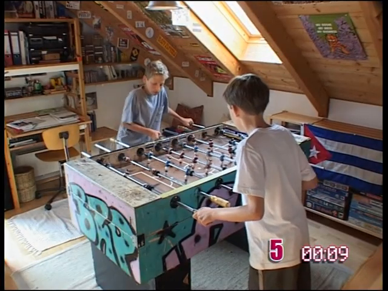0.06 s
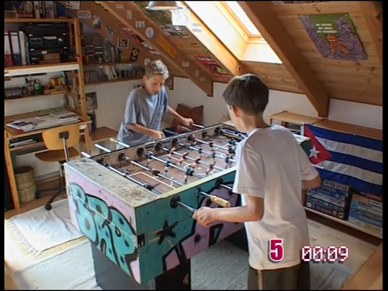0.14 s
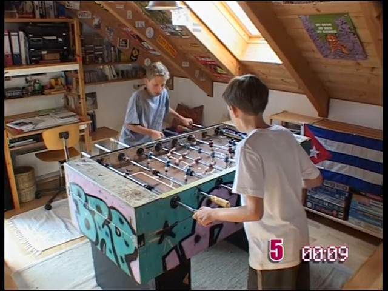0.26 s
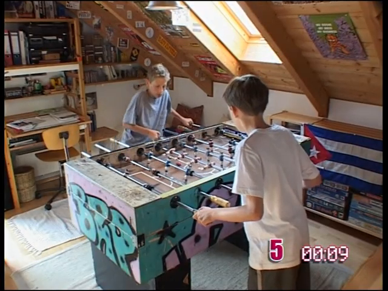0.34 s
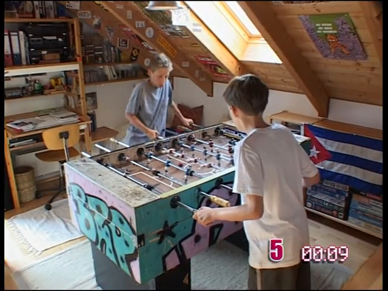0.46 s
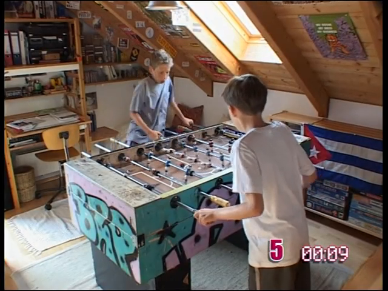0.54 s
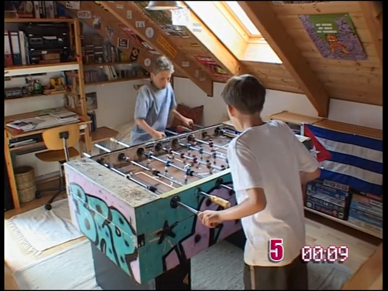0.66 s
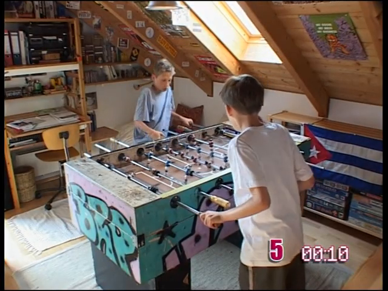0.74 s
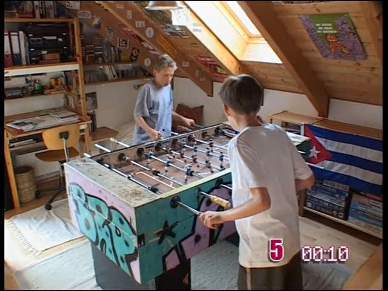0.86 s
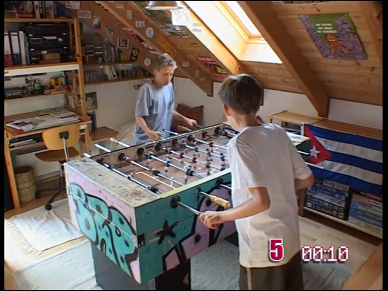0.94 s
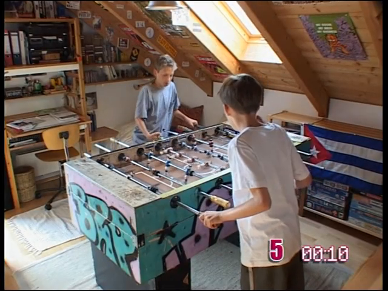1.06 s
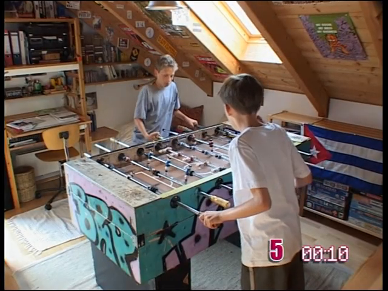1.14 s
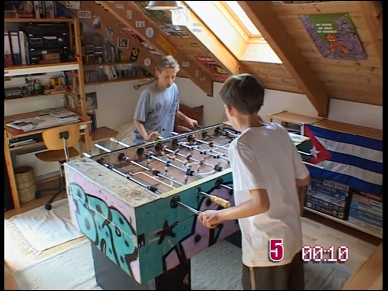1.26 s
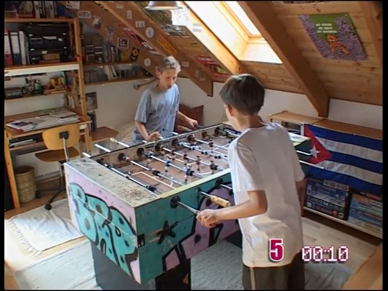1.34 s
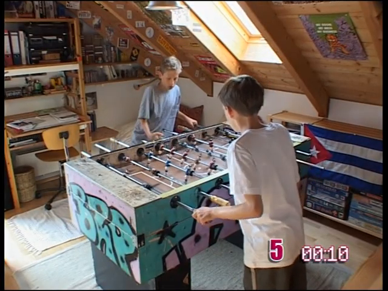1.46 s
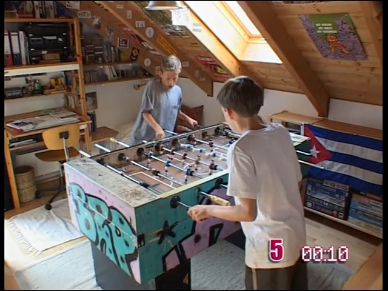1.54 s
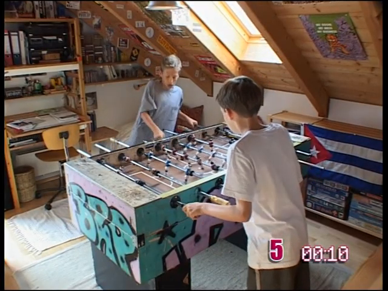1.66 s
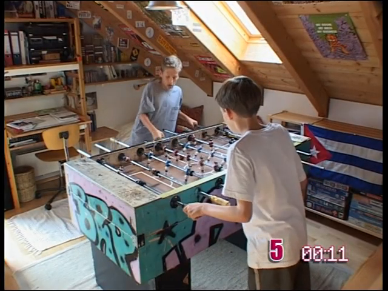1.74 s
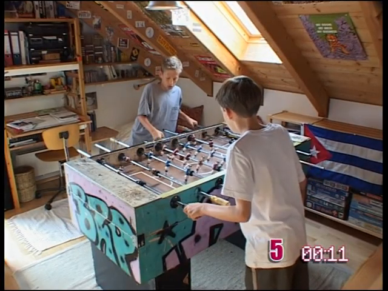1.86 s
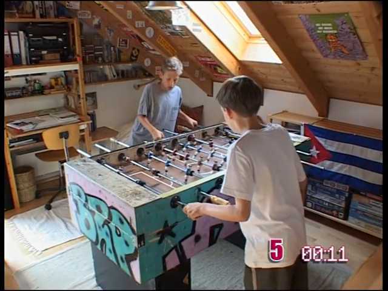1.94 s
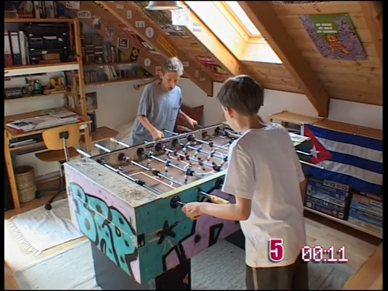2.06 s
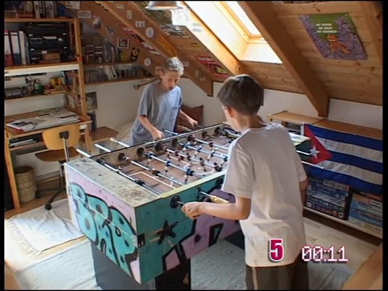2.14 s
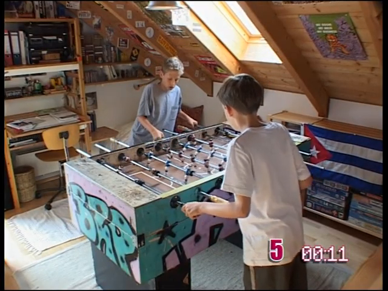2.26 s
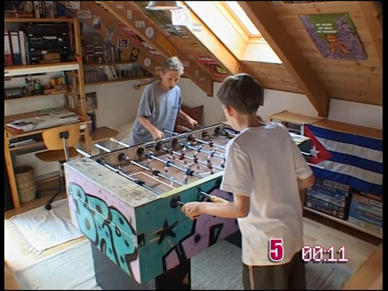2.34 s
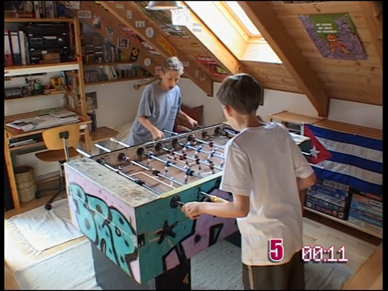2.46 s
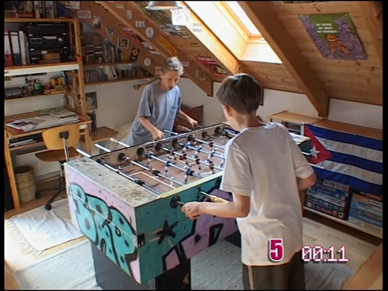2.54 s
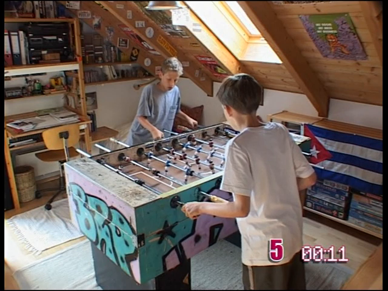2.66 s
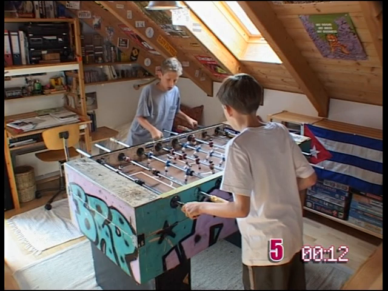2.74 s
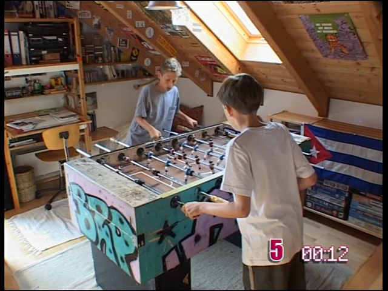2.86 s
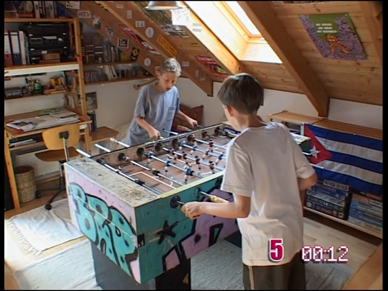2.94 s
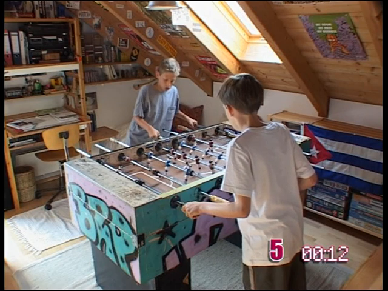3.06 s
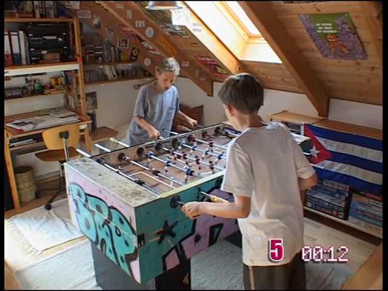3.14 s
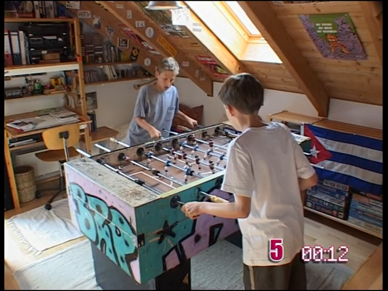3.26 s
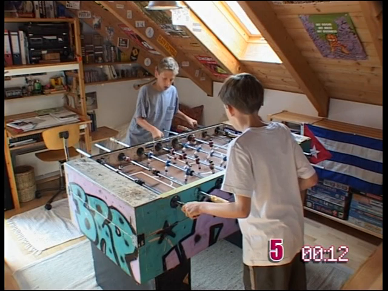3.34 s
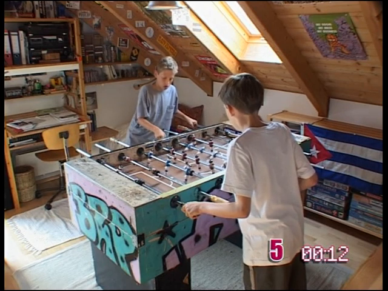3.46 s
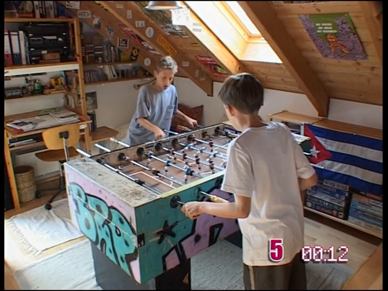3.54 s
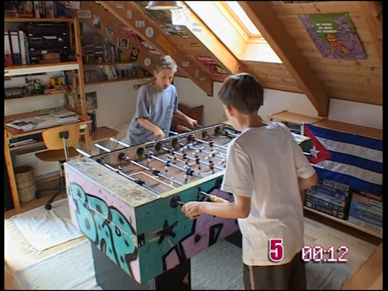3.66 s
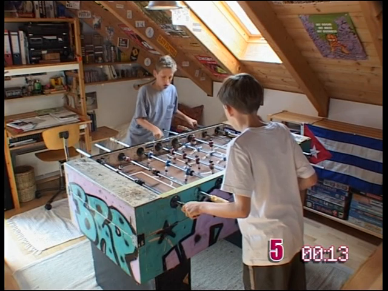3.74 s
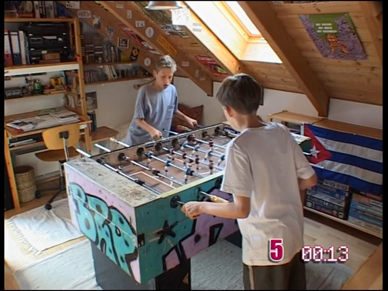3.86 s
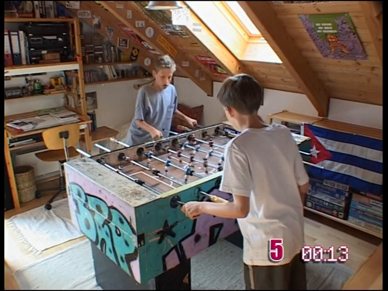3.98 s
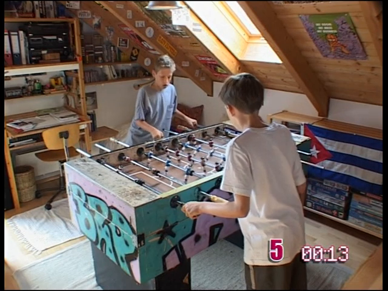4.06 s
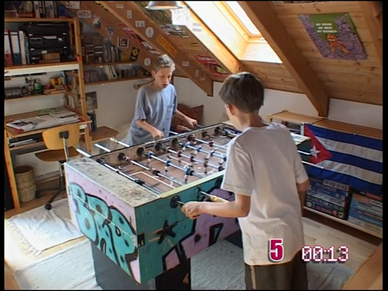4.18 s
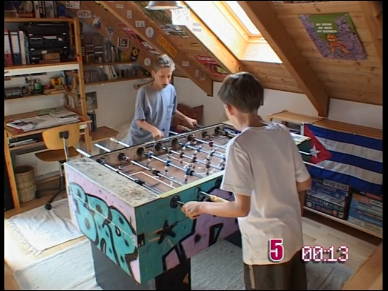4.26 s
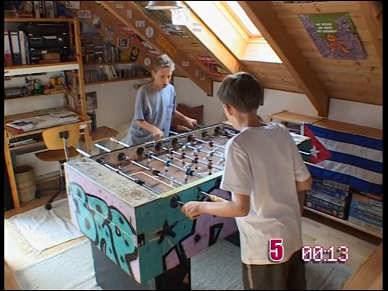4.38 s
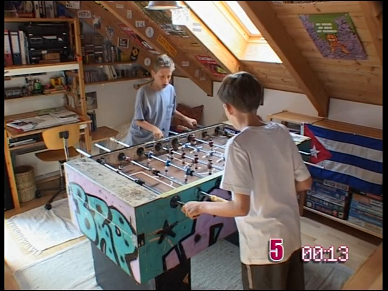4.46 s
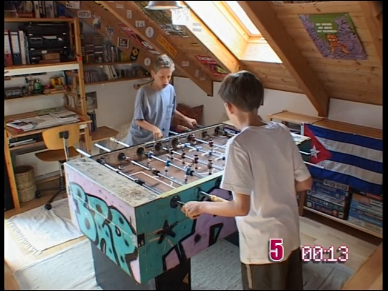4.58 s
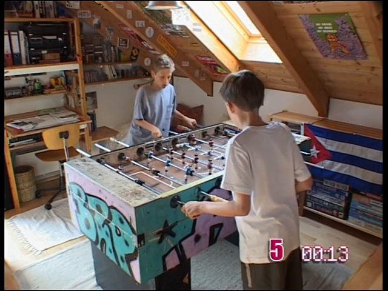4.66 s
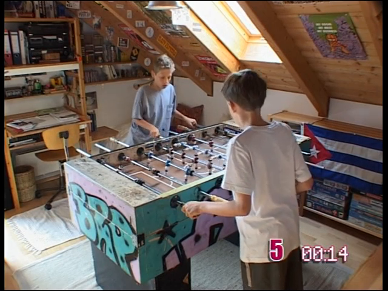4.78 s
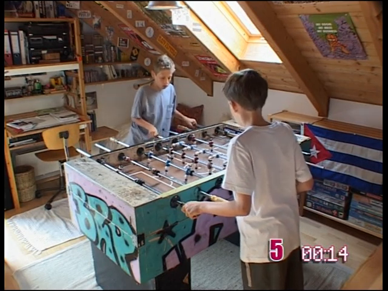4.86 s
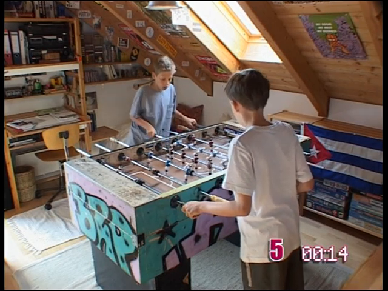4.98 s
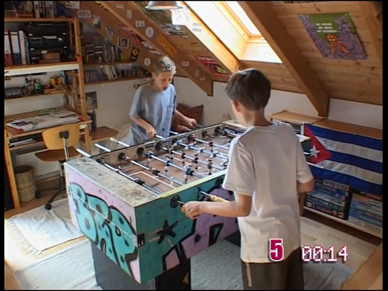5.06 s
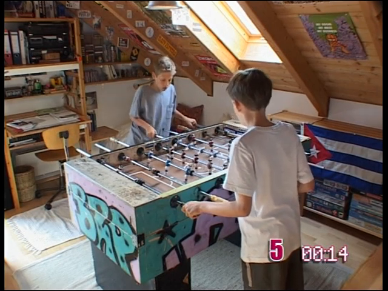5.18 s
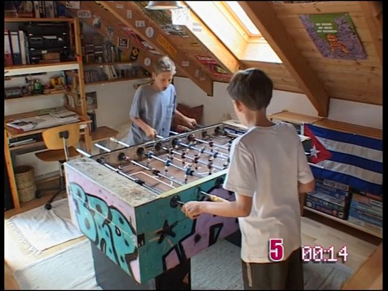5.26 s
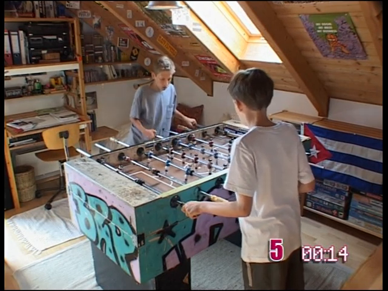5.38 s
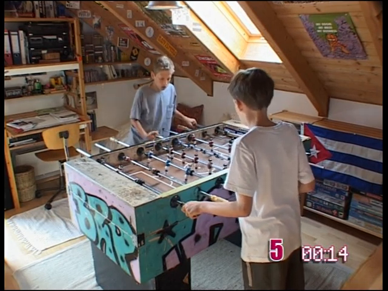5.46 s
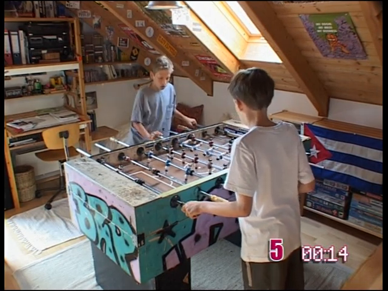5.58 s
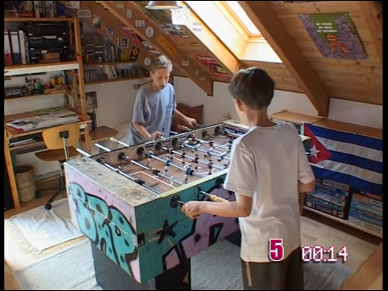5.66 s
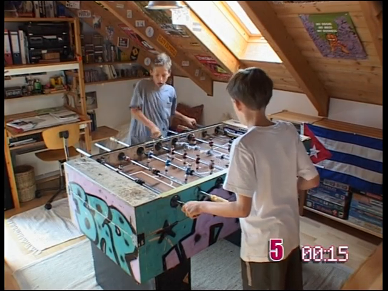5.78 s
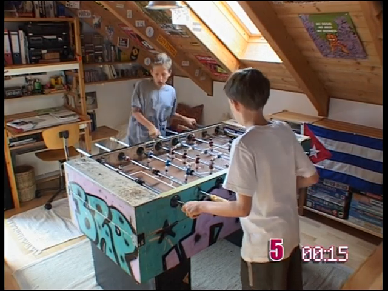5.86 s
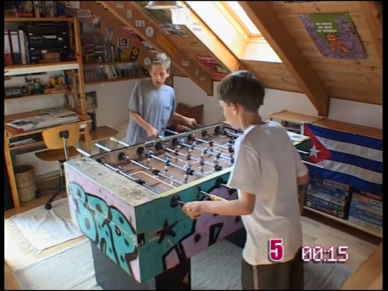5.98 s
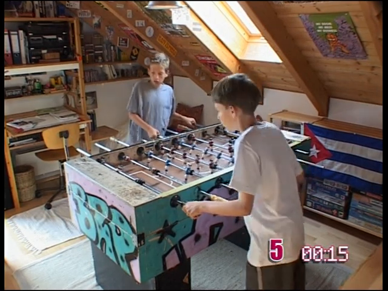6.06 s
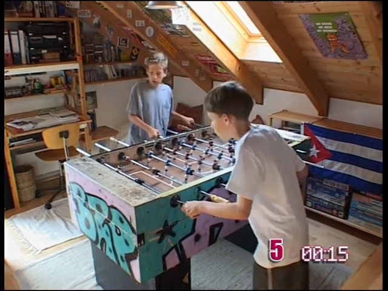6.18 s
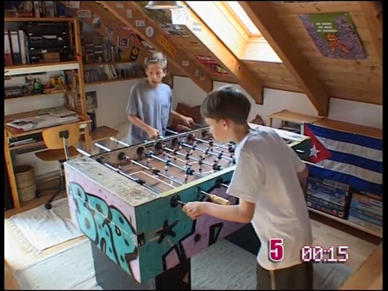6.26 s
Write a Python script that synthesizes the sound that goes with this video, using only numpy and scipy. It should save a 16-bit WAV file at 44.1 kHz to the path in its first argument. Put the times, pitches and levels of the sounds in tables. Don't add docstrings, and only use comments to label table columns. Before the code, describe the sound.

Table football in a small wood-lined room, heard from a few metres by a small camera microphone. A pair of hard clacks comes early, then a few woody knocks with the ball rumbling softly between them. Play goes quiet with faint taps and rod slides, one moderate knock, then a hard stroke and a cluster of loud cracks near the end. Faint hiss, hum and a brief lens whine lie beneath.

```python
import sys
import numpy as np
from scipy import signal
from scipy.fft import rfft, irfft, next_fast_len
from scipy.io import wavfile
from scipy.ndimage import uniform_filter1d

SR = 44100
rng = np.random.default_rng(int(sys.argv[2]) if len(sys.argv) > 2 else 0)


def field_ratio(decibels):
    return 10 ** (np.asarray(decibels, dtype=float) / 20)


def output_pcm(signal):
    pcm = np.clip(np.atleast_2d(signal).T, -1, 1) * 32767
    wavfile.write(sys.argv[1], SR, np.round(pcm).astype(np.int16))


N = 278271

# frequency in Hz, level in dB per Hz.
HISS_COLOUR = [(12, -32.5), (20, 2), (52, 1), (162, -6), (214, -15), (239, -12.5), (267, -6), (343, -12.5),
               (429, -12), (1080, -17), (2550, -23.5), (10300, -23.5), (15600, -24.5),
               (15950, -27), (16080, -75)]
HISS_DB = -58.5
# frequency in Hz, level in dB.
HISS_WIDTH = [(25, -31), (60, -3), (200, -8), (800, -18.5), (2500, -13.5), (6000, -7), (10000, -3),
              (16000, 2.5)]
HUM_HZ, HUM_DB = 218, -64
LOW_HUM_HZ, LOW_HUM_DB = 53, -67
LENS_HZ, LENS_WIDTH_HZ, LENS_DB = 8240, 1500, -68
LENS_STOP_S, LENS_FADE_S = 2.2, 0.03
LENS_BRAKE_DB, LENS_BRAKE_S = 6.5, 0.2

# time in seconds, level in dB.
ROLL_CURVE = [(0, -56), (.45, -64.5), (.6, -55), (1, -57.5), (1.2, -82.5), (1.4, -56.5), (1.7, -49.5),
              (1.95, -61.5), (2.2, -92.5), (2.5, -68), (2.86, -71), (2.91, -62), (3.45, -57), (4.2, -67),
              (5.75, -72), (5.82, -48), (5.97, -36.5), (6.2, -72)]
# frequency in Hz, level in dB per Hz.
ROLL_COLOUR = [(41, -41), (70, 4.5), (107, -1.5), (187, -10), (220, -7.5), (524, -12.5), (871, -16),
               (1030, -20), (3500, -31.5), (4550, -88), (7700, -120)]
# start in seconds, hold in seconds, level in dB.
SLIDES = [
    (.1, 0.48, -72),
    (1.146, 0.52, -73.5),
    (2.883, 0.088, -62.5),
    (3.36, 0.059, -64.5),
    (3.85, 0.72, -75),
    (4.584, 0.073, -65),
    (4.753, 1, -81),
    (5.71, 0.065, -61),
    (5.81, 0.091, -37),
    (6.26, .05, -61),
]
# frequency in Hz, level in dB per Hz.
SLIDE_COLOUR = [(400, -32), (900, 2), (1300, -4), (1900, -11.5), (2800, -15), (5000, -41)]
SLIDE_RISE_S, SLIDE_FADE_DB_PER_S = 0.03, 119

# frequency in Hz, level in dB, t60 in seconds.
CABINET = [(58.3, -11, 0.17), (76, -4.5, 0.061), (103.6, -1.5, 0.18), (165.3, -1, 0.058)]
PLAYFIELD = [(242, -7.5, 0.25), (285, -4.5, 0.16)]
BOARD = [(378.7, 0.5, 0.08), (448.4, -1.6, 0.074)]
END_WALLS = [(560, 0, 0.025), (736, 0, 0.02)]
SIDE_WALLS = [(930, -2.5, 0.016), (1090, -2, 0.014), (1280, -4.3, 0.016)]
THUD_RISE_S = [0.0027, 0.0029, 0.0011, 0.0031, 0.006]
BOARD_DB = -3
# time in seconds, side walls in dB, then cabinet, playfield, end walls in dB over that.
THUDS = [(0.249, -49, 12.5, 1.5, -0.5), (0.297, -37, -15, -7, -3), (0.624, -43.5, -4.5, 0.5, 3.5),
         (0.697, -50.5, 11.5, 13.5, -6), (0.722, -25, -29, -12, -2), (0.78, -28, -10, -16.5, -2),
         (1.447, -30, 1, -2.5, 2.5), (1.593, -30.5, -9, -6, -4.5), (1.766, -25.5, -4.5, -10, -5),
         (2.493, -51, 16.5, 3, 14), (3.289, -55, 11.5, 7.5, 5.5), (3.357, -58.5, 6, -16.5, -7.5),
         (3.53, -48, 6.5, 2.5, 12), (3.956, -37.5, 2.5, -5, -6.5), (5.074, -50, 2, -5, 3.5),
         (5.819, -47.5, 10.5, 15.5, -10.5), (5.831, -22.5, -8.5, -7, -1.5), (6.001, -21, -17.5, -18, -4),
         (6.063, -18.5, -19, -5, 2), (6.126, -24, -3, -13, 1.5), (6.159, -69, 4, 7, -3)]
# time in seconds, side walls in dB.
NUDGES = [
    (0.039, -59.5),
    (2.229, -76),
    (2.882, -64),
    (4.386, -66),
    (5.721, -64),
]
# Cabinet, playfield, end walls of a nudge, in dB over its side walls.
NUDGE_DBS = (-9, 0.5, 6)
# level in dB, frequency in Hz, t60 in seconds.
NUDGE_RING = (5.4, 329, 0.19)

# time in seconds, figure in dB, then ball, rod, contact tick in dB over that.
CLACKS = [(0.2514, -51, -9, -13, -20), (0.294, -39, -24, -27, -30), (0.622, -44.5, -19, -10, -19),
          (0.7234, -16, -9, -16, -31.5), (0.7816, -17, 0.5, -5.5, -29), (1.4523, -26.5, -16.5, -16.5, -32),
          (1.553, -43.5, -8, -5, -11), (1.5904, -31, -18.5, -28, -40), (1.7659, -20.5, -17, -21, -40),
          (2.4913, -42, -18, -25, -29.5), (3.29, -68, -1.5, -7.5, -10), (3.532, -46, -6.5, -10, -27.5),
          (3.9558, -31, -23, -17.5, -36), (4.5959, -54, -26.5, -19.5, -20), (5.071, -53.5, -4.5, 1, -17.5),
          (5.8299, -13.5, 2.5, -6, -23), (6.001, -22.5, -6, -6.5, -21), (6.0631, -15, -5.5, -1.5, -14.5),
          (6.0664, -10.5, -14.5, -6, -15), (6.123, -23, -24, -13, -26)]
# frequency in Hz, level in dB over the part's peak level.
PARTS = [
    [(500, 1), (1100, 20.5), (1600, 25), (2200, 21.5)],
    [(2800, 26.5), (3400, 24)],
    [(4500, 26), (5200, 24.5)],
    [(6600, 19), (8200, 12)],
    [(11000, 21.5), (15000, 9), (20000, -8)],
]
SHELL_DB = -1
GAP_HZ, GAP_WIDTH_HZ, GAP_DB_PER_DB = 2663, 260, -3.5

# time in seconds, level in dB, frequency in Hz, t60 in seconds, room share in dB.
PINGS = [(0.622, -48, 968, 0.12, 8.5), (0.723, -23.5, 1810, 0.029, 6), (0.781, 1.5, 4040, 0.0048, -4.5),
         (0.783, -25, 3650, 0.011, 3), (0.938, -48, 282, 0.082, -1), (.943, -57.5, 2440, 0.02, 6),
         (.315, -36.5, 611, 0.11, -6.5), (1.77, -31.5, 282, 0.16, -13), (1.454, -16.5, 940, 0.041, -7.5),
         (1.553, -41.5, 5070, 0.017, -10), (1.553, -43.5, 9400, .008, -8), (1.579, -26, 2920, 0.0073, -9.5),
         (1.872, -41.5, 496, 0.15, -10.5), (2.52, -45.5, 973, 0.14, -7.5), (3.96, -29, 285, 0.24, -9),
         (5.076, -54.5, 930, 0.1, 1), (5.83, -2.5, 3700, 0.0083, -5.5), (5.8303, -23.5, 5130, 0.022, 2),
         (6.066, -14, 2380, 0.026, -1), (6.066, -13, 736, 0.11, -13), (6.067, -23.5, 285, 0.17, -9),
         (6.188, -35.5, 5230, 0.0027, 3.5), (6.188, -38, 10000, .0015, -13), (6.280, -39, 5260, 0.0021, -2)]
# time in seconds, level in dB.
SNAPS = [
    (0.7811, -24.5),
    (5.829, -18),
]
SNAP_HZ, SNAP_T60_S, SNAP_ROOM_DB = 14500, 0.0014, -11.5

# frequency in Hz, t60 in seconds.
ROOM_DECAY = [(80, 0.29), (250, 0.33), (800, 0.3), (2000, 0.23), (4000, 0.21), (7000, 0.17), (12000, 0.082)]
THUD_ROOM_DB, CLACK_ROOM_DB = 4.5, 5.5
# frequency in Hz, level in dB.
TABLE_WIDTH = [(60, -20), (150, -28), (380, -24), (950, -29.5), (2380, -21.5), (5980, -12), (15000, -1.5)]
# frequency in Hz, level in dB.
TREBLE_LEAN = [(3000, -68), (8000, -30), (14000, -28)]
DUCK_OVER_DB, DUCK_SHARE, DUCK_BACK_DB_PER_S = -29, 0.26, 3
# frequency in Hz, level in dB.
BAND_EDGE = [(16500, 0), (16950, -40)]


def evened(x):
    return x / np.sqrt(np.mean(x ** 2) + 1e-20)


def read(points, hz):
    f, value = np.transpose(points)
    return np.interp(np.log(hz + 1), np.log(f + 1), value)


def level(curve):
    return field_ratio(np.interp(np.arange(N) / SR, *np.transpose(curve)))


def coloured(x, points):
    count = x.shape[-1]
    size = next_fast_len(count)
    gain = field_ratio(read(points, np.fft.rfftfreq(size, 1 / SR)))
    return irfft(rfft(x, size) * gain, size)[..., :count]


def narrow(hz, width_hz):
    r = np.exp(-np.pi * width_hz / SR)
    noise = rng.standard_normal(N) + 1j * rng.standard_normal(N)
    slow = signal.lfilter([1], [1, -2 * r, r * r], noise)
    slow = slow / np.sqrt(np.mean(abs(slow) ** 2))
    return slow * np.exp(2j * np.pi * hz * np.arange(N) / SR)


def hiss():
    middle, side = coloured(rng.standard_normal((2, N)), HISS_COLOUR)
    side = coloured(side, HISS_WIDTH)
    return field_ratio(HISS_DB) * evened(np.array([middle + side, middle - side]))


def hum():
    steady = 1.7 * np.exp(2j * np.pi * HUM_HZ * np.arange(N) / SR)
    phase = np.angle(steady + narrow(HUM_HZ, 12))
    tone = np.sqrt(2) * np.cos(phase)
    return field_ratio(HUM_DB) * tone + field_ratio(LOW_HUM_DB) * narrow(LOW_HUM_HZ, 6.6).real


def lens_motor():
    left_s = LENS_STOP_S - np.arange(N) / SR
    push_db = LENS_BRAKE_DB * np.clip(1 - left_s / LENS_BRAKE_S, 0, 1)
    gain = field_ratio(LENS_DB + push_db) * np.clip(left_s / LENS_FADE_S + 1, 0, 1)
    shared = narrow(LENS_HZ, LENS_WIDTH_HZ).real
    apart = narrow(LENS_HZ, LENS_WIDTH_HZ).real
    return gain * (shared + 0.53 * apart * [[1], [-1]])


def camera():
    return hiss() + hum() + lens_motor()


def room(fill_s=0.0017):
    count = SR // 3
    hz, t, z = signal.stft(rng.standard_normal((2, count)), SR, nperseg=256)
    decay = field_ratio(-60 * t / read(ROOM_DECAY, hz)[:, None])
    tail = signal.istft(z * decay, SR, nperseg=256)[1][:, :count]
    tail *= np.clip(np.arange(count) / SR / fill_s, 0, 1)
    return tail / np.linalg.norm(tail[0])


def rubbing(gain, colour, bumps_per_s, lump_db=6.5):
    bumps = (rng.random(N) < bumps_per_s / SR) * rng.standard_normal(N)
    bumps *= field_ratio(lump_db * np.minimum(rng.exponential(1, N), 2))
    blurred = signal.fftconvolve(bumps[None], room(), axes=1)[:, :N]
    return gain * evened(coloured(blurred, colour))


def strokes():
    start_s, hold_s, db = np.transpose(SLIDES)
    t = np.arange(N)[:, None] / SR - start_s
    swell = np.clip(t / SLIDE_RISE_S, 0, 1)
    fade_db = SLIDE_FADE_DB_PER_S * np.maximum(t - hold_s, 0)
    return (swell * field_ratio(db - fade_db)).max(1)


def rolling():
    ball = rubbing(level(ROLL_CURVE), ROLL_COLOUR, 1500)
    rods = rubbing(strokes(), SLIDE_COLOUR, 2500)
    return ball + rods


def ring(modes, rise_s, luck, first, spot_db=0.5, detune=0.035):
    hz, db, t60 = np.transpose(modes)
    t = np.arange(SR // 4)[:int(t60.max() * SR) + 99, None] / SR
    spot, shift = luck[:, :len(hz)]
    sense = (-1) ** (first + np.arange(len(hz)))
    envelope = sense * field_ratio(db + spot_db * spot - 60 * t / t60)
    x = (envelope * np.sin(2 * np.pi * hz * (1 + detune * shift) * t)).sum(1)
    x *= 1 - np.exp(-t[:, 0] / max(rise_s, 1e-5))
    return np.pad(x / abs(x).max(), (0, SR // 4 - len(x)))


def thud(dbs):
    bodies = (CABINET, PLAYFIELD, BOARD, END_WALLS, SIDE_WALLS)
    luck = rng.standard_normal((2, 4))
    firsts = np.cumsum([0] + [len(modes) for modes in bodies])
    return sum(field_ratio(db) * ring(modes, rise_s, luck, first)
               for modes, rise_s, first, db in zip(bodies, THUD_RISE_S, firsts, dbs))


def ping(db, hz, t60, rise_turns=0.55):
    t = np.arange(SR // 4) / SR
    rise = 1 - np.exp(-t * hz / max(rise_turns, 0.01))
    return rise * field_ratio(db - 60 * t / t60) * np.sin(2 * np.pi * hz * t)


def clack(dbs, gap_db, size=2048):
    points = [(hz, db + over) for part, db in zip(PARTS, dbs) for hz, over in part]
    hz = abs(np.fft.fftfreq(size, 1 / SR))
    gap = gap_db * np.exp(-((hz - GAP_HZ) / GAP_WIDTH_HZ) ** 2)
    log_gain = np.log(field_ratio(read(points, hz) + gap))
    minimum_phase = np.exp(np.conj(signal.hilbert(log_gain)))
    return np.fft.ifft(minimum_phase).real[:size // 2]


def add(out, s, blow, room_db, scatter_s=0.0018, size=256):
    scatter = 0.19 * rng.standard_normal(size) * np.exp(-np.arange(size) / SR / scatter_s)
    scatter[0] = 1
    direct = signal.fftconvolve(blow, scatter / np.linalg.norm(scatter))
    sound = field_ratio(room_db) * signal.fftconvolve(blow[None], room(), axes=1)
    sound[0, :len(direct)] += direct
    at = round(s * SR)
    out[:, at:at + sound.shape[1]] += sound


def blows():
    out = np.zeros((2, N + SR))
    rows = [(*row, False) for row in THUDS] + [(s, db, *NUDGE_DBS, True) for s, db in NUDGES]
    for s, wall, low, field, end, nudge in sorted(rows):
        board = (field + end) / 2 + BOARD_DB
        wood = thud((low, field, board, end, 0)) + nudge * ping(*NUDGE_RING)
        add(out, s, field_ratio(wall) * wood, THUD_ROOM_DB)
    for s, db, ball, rod, tick in CLACKS:
        gap_db = GAP_DB_PER_DB * max(ball, 0)
        shell = ball / 2 + SHELL_DB
        add(out, s, field_ratio(db) * clack((0, shell, ball, rod, tick), gap_db), CLACK_ROOM_DB)
    snaps = [(s, db, SNAP_HZ, SNAP_T60_S, SNAP_ROOM_DB) for s, db in SNAPS]
    for s, db, hz, t60, room_db in PINGS + snaps:
        add(out, s, ping(db, hz, t60), room_db)
    return out[:, :N]


def scene():
    middle, scattered = blows() + rolling()
    lagging = signal.hilbert(middle, next_fast_len(N))[:N].imag
    side = coloured(1.13 * lagging + 0.09 * scattered, TABLE_WIDTH) + coloured(middle, TREBLE_LEAN)
    return np.array([middle - side, middle + side]) + camera()


def ducked(x, size=441):
    power = abs(uniform_filter1d((x ** 2).mean(0), size))
    power_db = 10 * np.log10(power + 1e-12)
    back_db = np.arange(N) * DUCK_BACK_DB_PER_S / SR
    held_db = np.maximum.accumulate(power_db + back_db) - back_db
    over_db = np.maximum(held_db - DUCK_OVER_DB, 0)
    return x / field_ratio(DUCK_SHARE * uniform_filter1d(over_db, size))


def low_pass(x):
    return signal.sosfilt(signal.butter(12, 16990, fs=SR, output="sos"), x)


def record(dry):
    mix = coloured(ducked(dry), BAND_EDGE)
    return low_pass(mix)


dry = scene()
out = record(dry)
output_pcm(out)
```